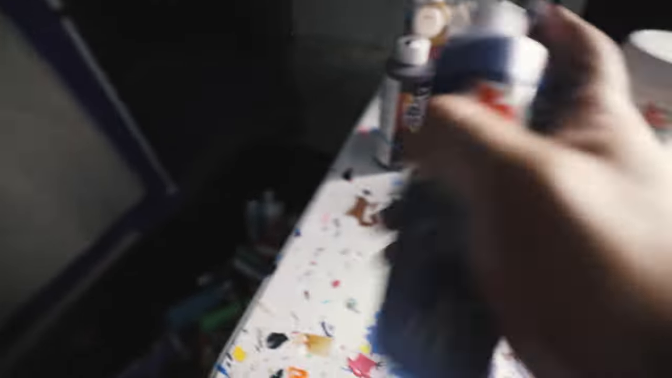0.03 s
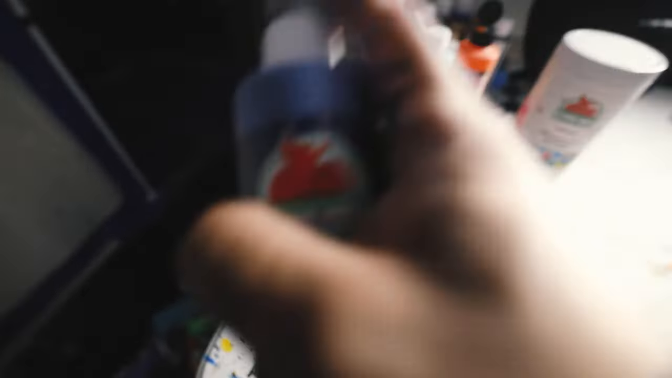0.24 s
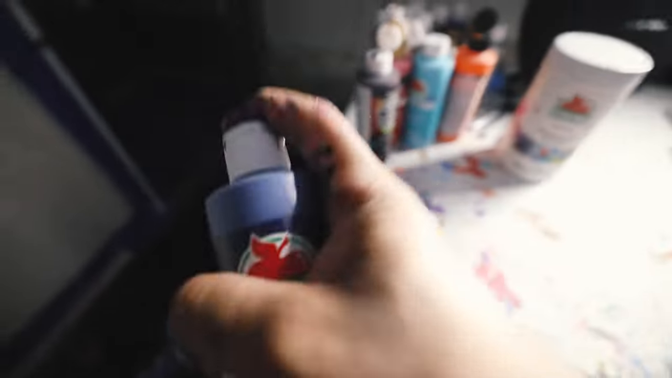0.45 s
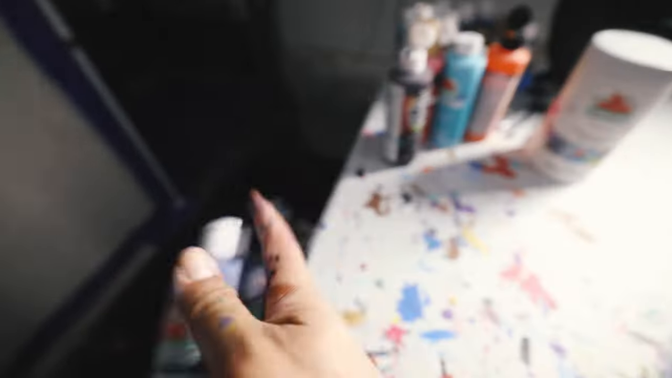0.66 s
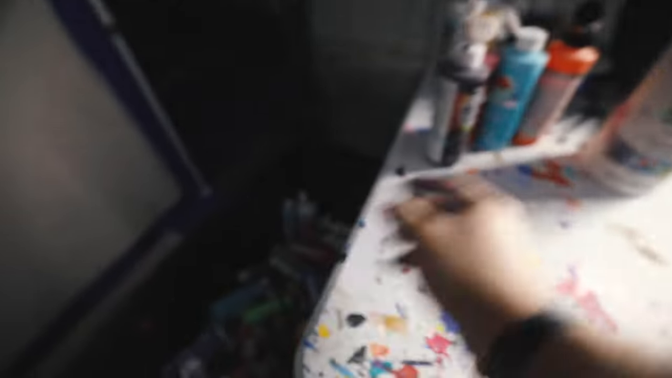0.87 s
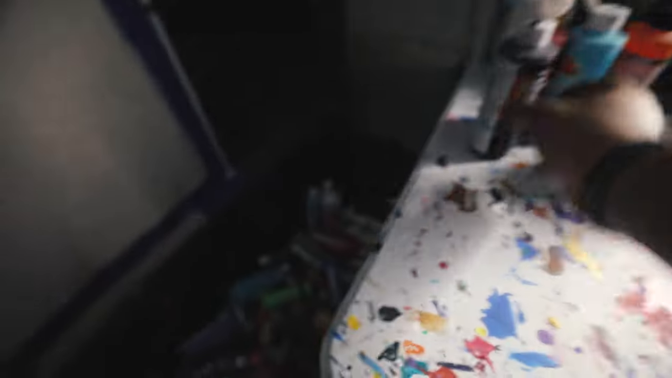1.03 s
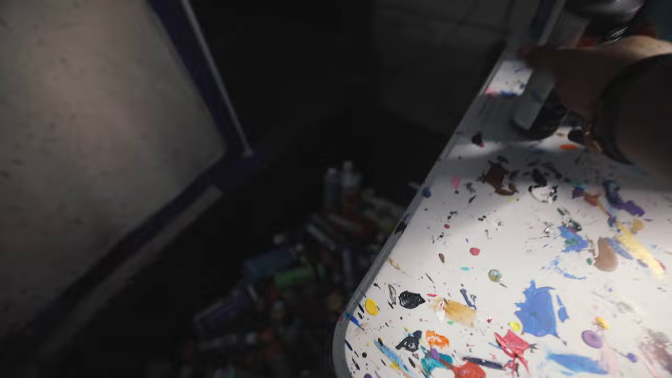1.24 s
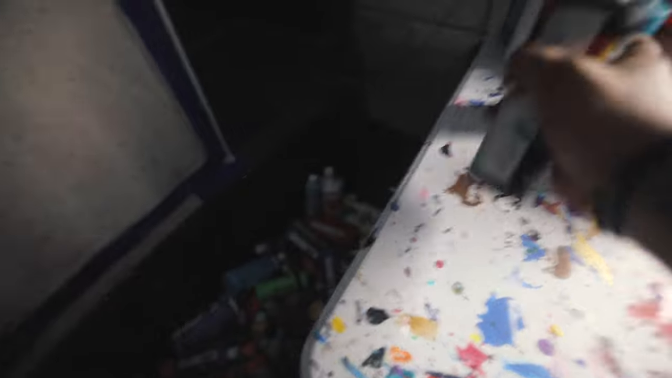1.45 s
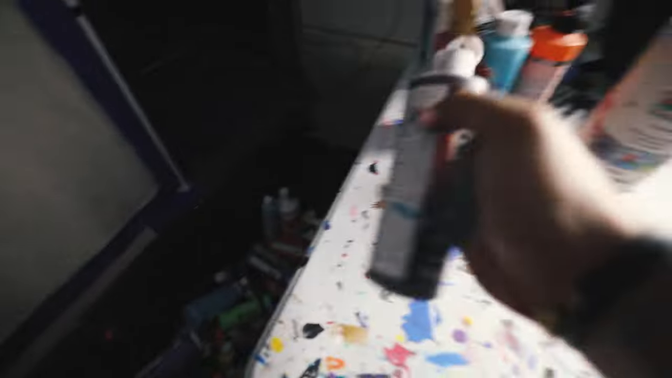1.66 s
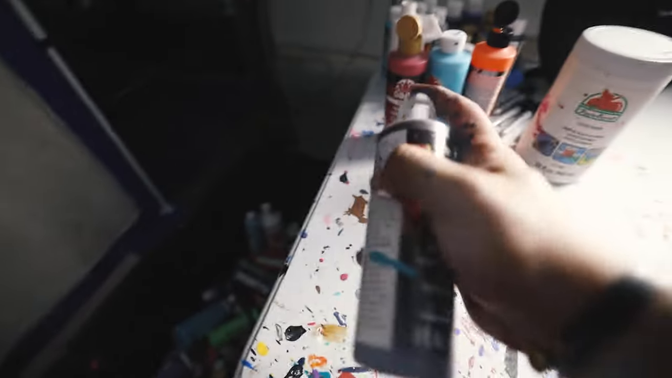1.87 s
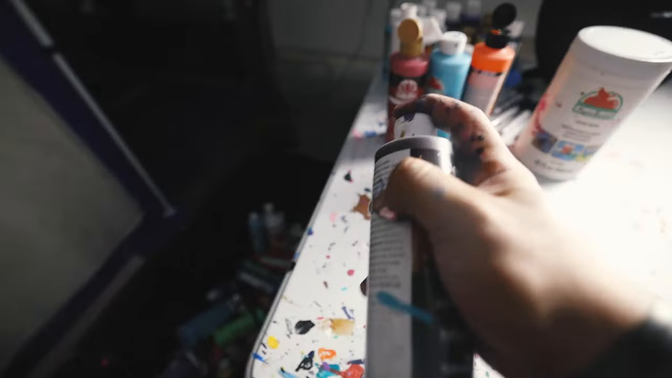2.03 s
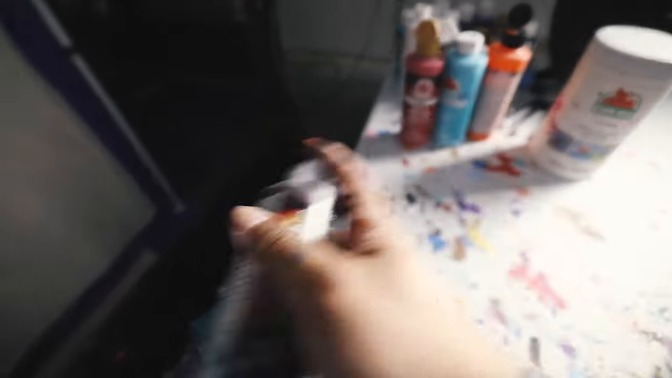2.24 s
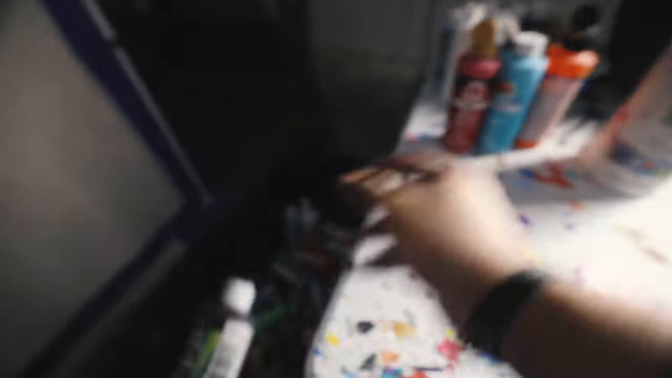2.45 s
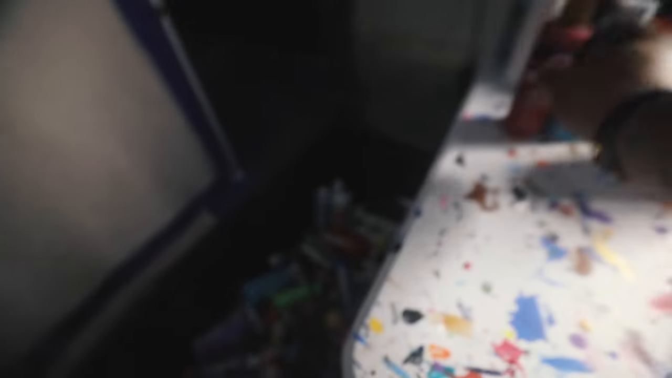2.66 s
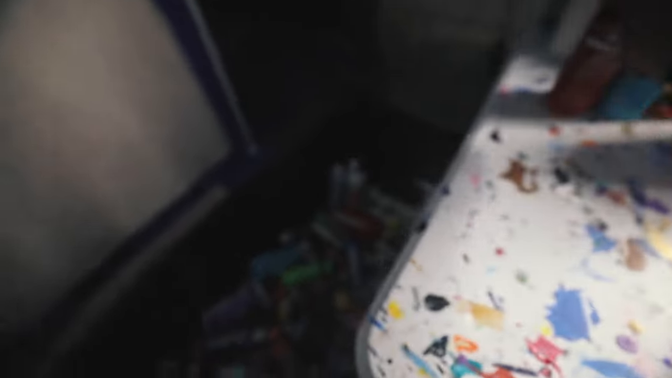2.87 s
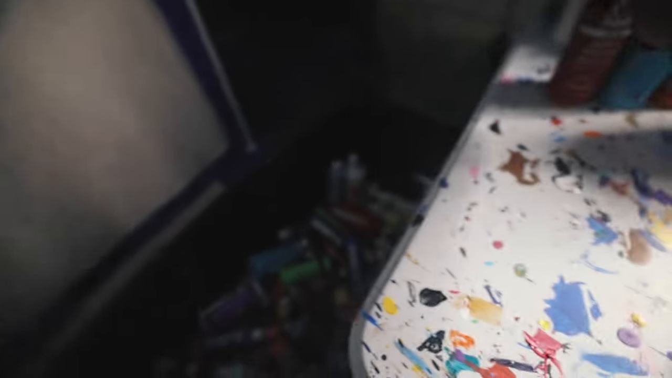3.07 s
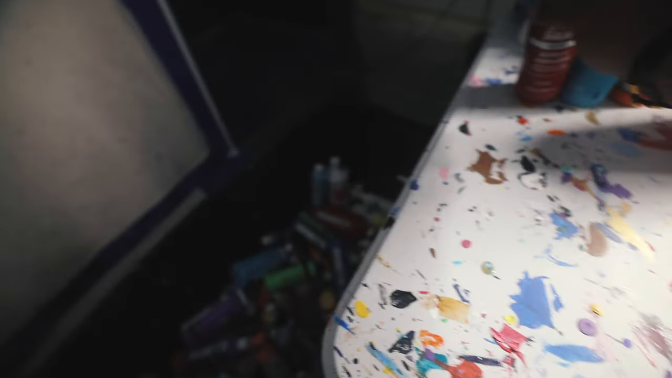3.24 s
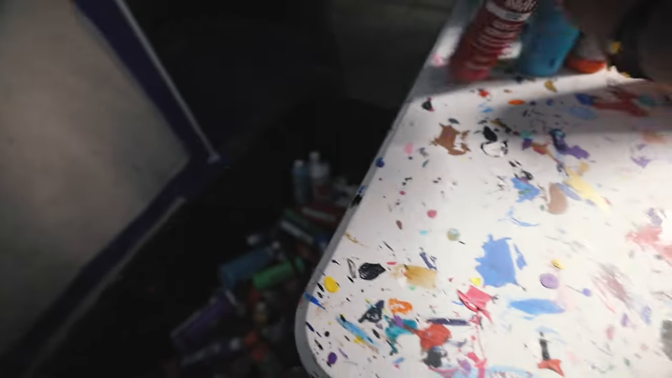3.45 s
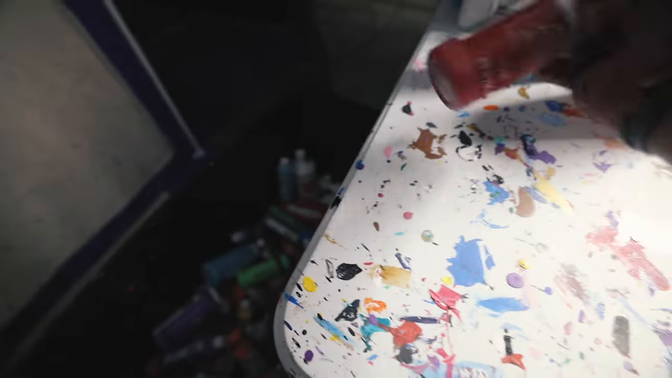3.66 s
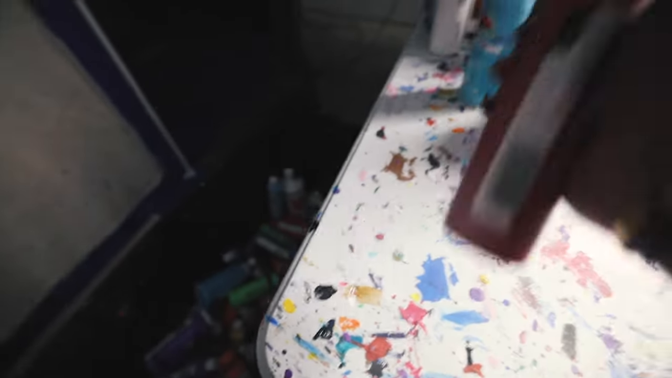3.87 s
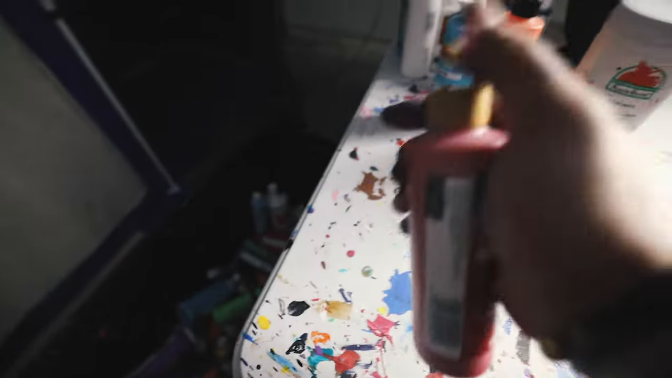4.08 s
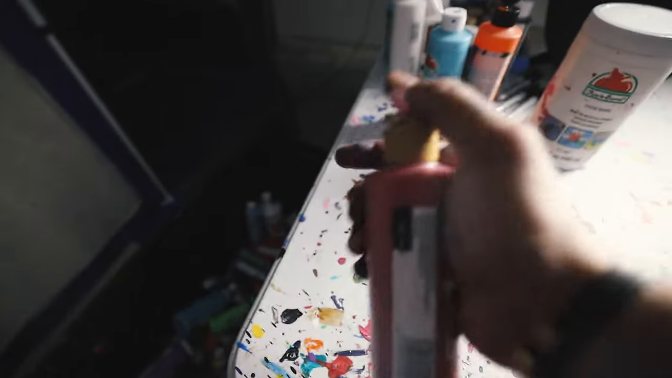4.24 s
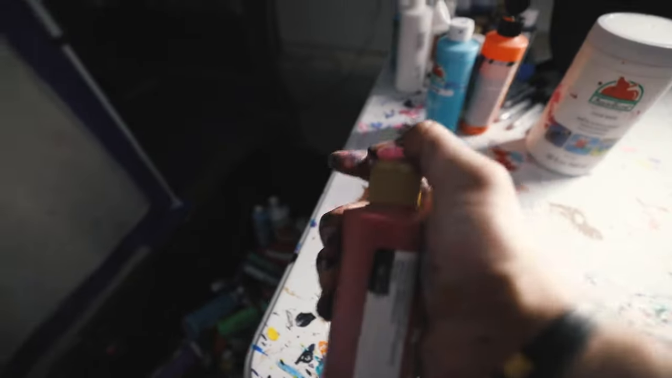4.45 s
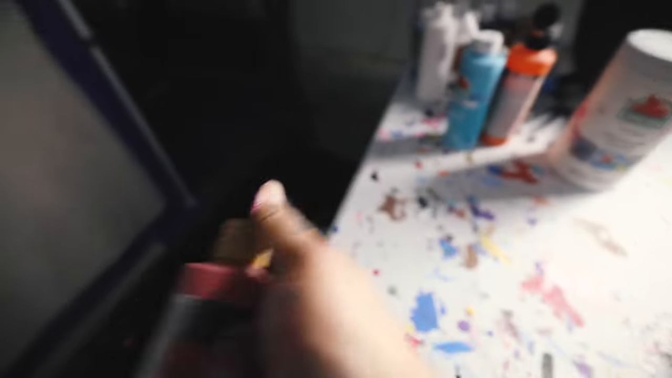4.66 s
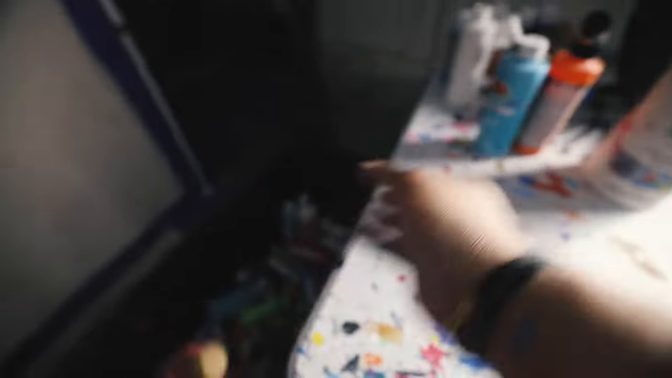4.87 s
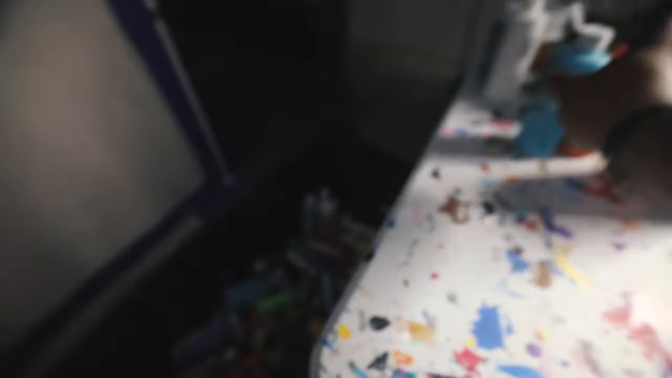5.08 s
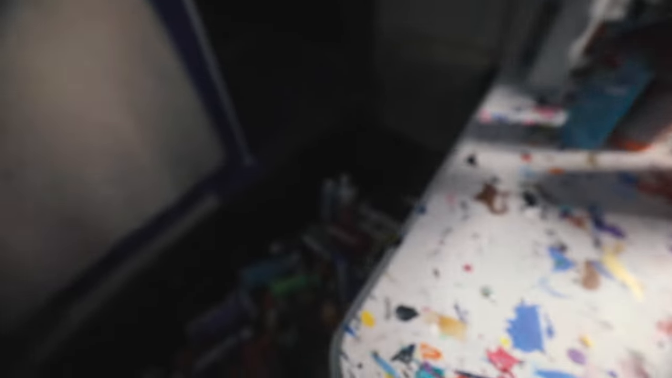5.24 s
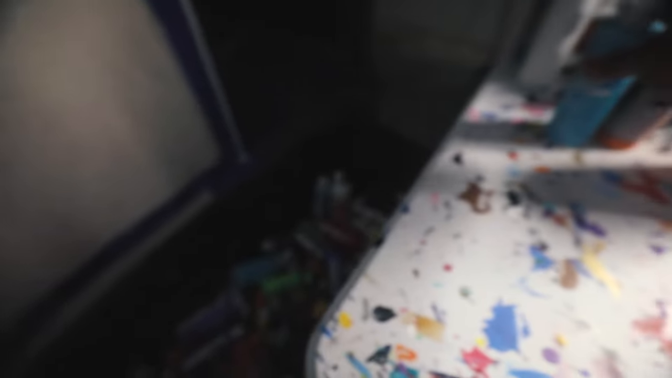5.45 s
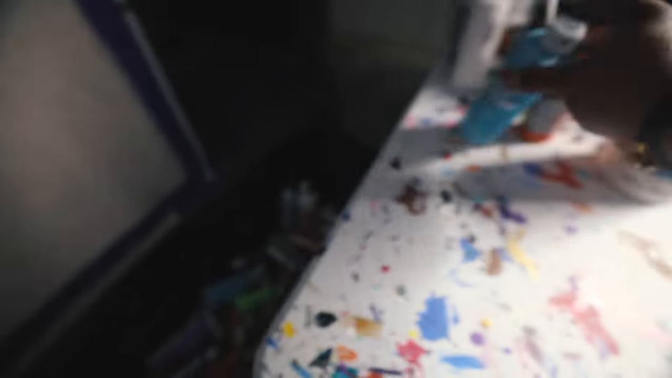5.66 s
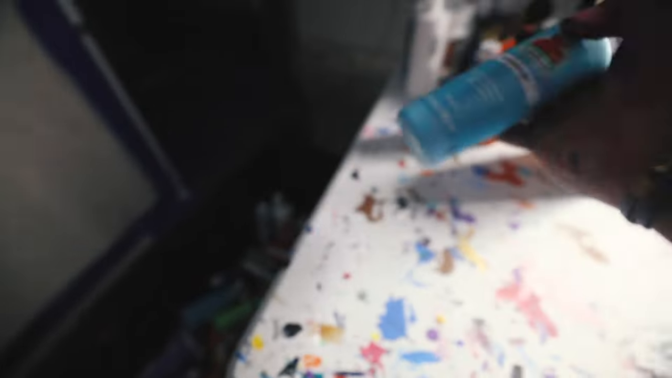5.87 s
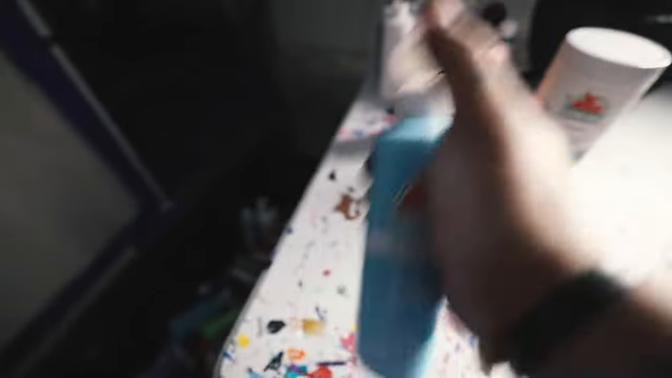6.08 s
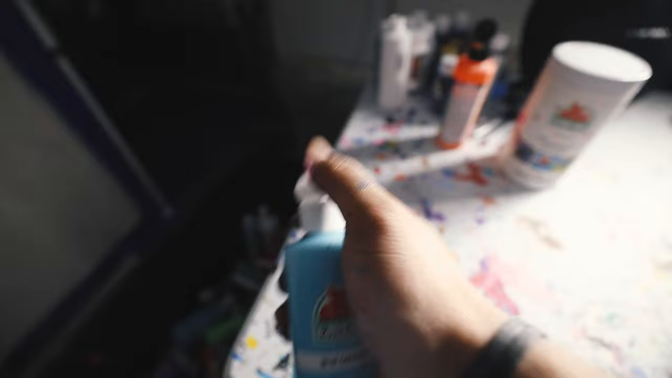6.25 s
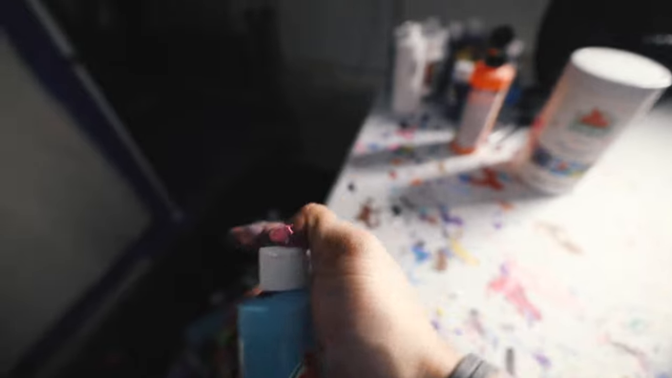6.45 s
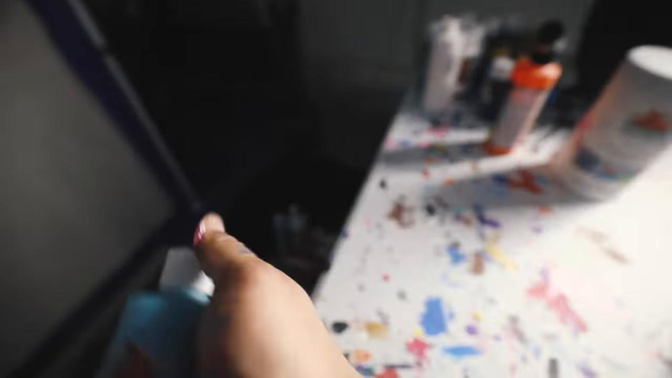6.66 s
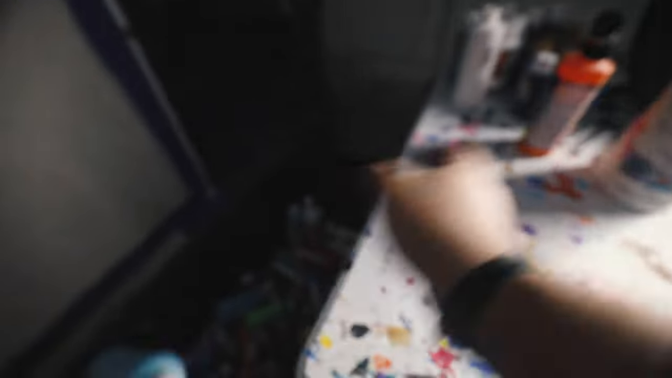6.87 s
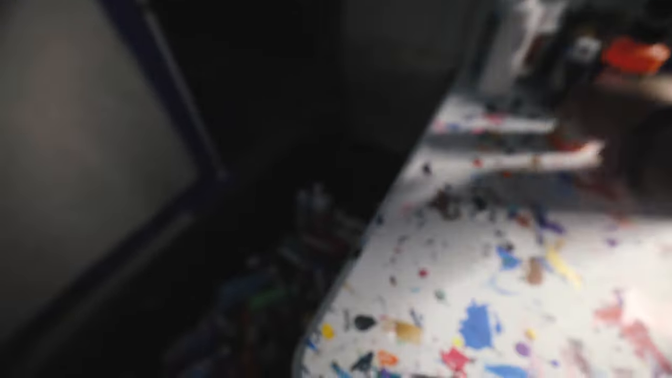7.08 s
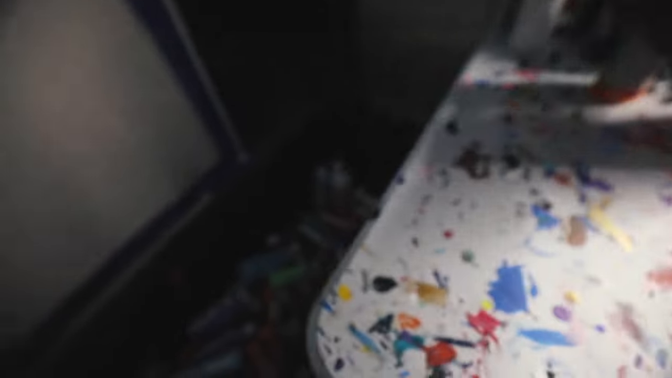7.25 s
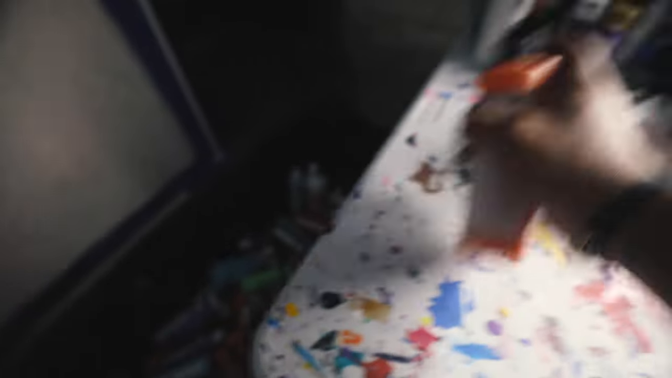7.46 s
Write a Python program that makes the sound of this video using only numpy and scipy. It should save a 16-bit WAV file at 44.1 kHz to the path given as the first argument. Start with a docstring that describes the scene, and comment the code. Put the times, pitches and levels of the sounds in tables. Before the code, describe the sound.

Sharp cap clicks and clattering plastic-on-table knocks alternate at irregular intervals, with faint finger rubs and nail ticks in a quiet, humming small room.

```python
"""Plastic paint bottles are picked from a crowded folding table in a small studio, over low ventilation hum.
Fan tones and shaped noise run throughout. First come light knocks and finger rubs (grainy skin noise), with nail
ticks (decaying resonant noise) among them; then a flip cap snaps close by (a crack coloured by lid and rim).
Harder knocks follow, each a noisy clack with ringing bottle-wall modes and a swelling boom of tabletop modes.
Snaps and bursts of knocks then alternate to the end, with small grip shifts, taps and slides around them."""
import sys
import numpy as np
from scipy import signal
from scipy.fft import rfft, irfft, next_fast_len
from scipy.io import wavfile
from scipy.ndimage import uniform_filter1d, minimum_filter1d, map_coordinates

SR = 44100
rng = np.random.default_rng(int(sys.argv[2]) if len(sys.argv) > 2 else 0)


def master_out(mix):
    """Clip the mix to full scale and print it as 16-bit PCM to the path in sys.argv[1]."""
    frames = np.transpose(np.atleast_2d(mix))
    ceiling = np.clip(frames, -1, 1)
    pcm = np.round(ceiling * 32767).astype(np.int16)
    wavfile.write(sys.argv[1], SR, pcm)


N = 331191
T = np.arange(int(SR * .6)) / SR  # time axis of one short sound, s

# Modes of the hollow tabletop. Each row: nominal frequency in Hz, relative level in dB, t60 in seconds.
TABLE_MODES = [(94, -32, 0.18), (108.8, -3, 0.3), (118, 2, 0.17), (138.5, -26.5, 0.95), (159.4, 5, 0.16),
               (177.9, -3, 0.34), (207.6, -5, 0.25), (231.5, -7, 0.32), (270.6, -8.5, 0.17),
               (309.3, -10.5, 0.25), (361.4, -20, 0.26), (401, -14.5, 0.22)]
# Noise spectrum of skin and nails on plastic. Each row: frequency in Hz, relative level in dB.
SKIN_SPECTRUM = [(300, -8), (1000, 10), (2200, 9.5), (5000, 6.5), (8000, -1), (12000, -0.5), (16000, -23)]


def knocks():
    """Impact and rebound: each blow is followed by a softer, duller one as the bottle rocks onto its other edge."""
    # Bottles knocking on the table. Each row: start in seconds, relative clack level in dB,
    # relative table boom level in dB, brightness in dB per octave, tabletop frequency the spot favours in Hz.
    blows = [(0.0, -41.5, -25.5, 0, 175), (0.15, -38.5, -32.5, -0.5, 270),
             (0.8369, -28.5, -33.5, -3.5, 169), (0.9126, -28.5, -31.5, -0.5, 168),
             (1.1036, -17, -19.5, 2, 128), (1.1208, -13.5, -10, 1, 119), (1.2697, -33, -40, -5, 160),
             (1.3472, -28.5, -16.5, 1.5, 178), (1.3696, -25, -32, -1, 174), (1.395, -26.5, -23, -1.5, 185),
             (1.4394, -29, -24, -0.5, 187), (1.53, -46, -30, 0, 127), (2.7676, -16, -14.5, 2.5, 130),
             (2.7844, -9, -19.5, 1, 130), (2.8173, -19, -13, 1.5, 128), (2.898, -31, -40, -3.5, 165),
             (2.9495, -36, -23, -0.5, 192), (3.0113, -28.5, -25, 1, 192), (3.1378, -34.5, -32.5, 0, 144),
             (3.5624, -35.5, -30.5, 2, 236), (5.1605, -8.5, -29, 1.5, 370), (5.1642, -9, -11.5, -5.5, 370),
             (5.2108, -17, -21.5, 2.5, 108), (5.2454, -22.5, -19.5, -0.5, 337),
             (5.733, -42.5, -38, 4.5, 162), (7.1574, -8.5, -5, 1, 151), (7.1959, -11, -10.5, -2, 162),
             (7.2428, -20.5, -15.5, 0, 153), (7.2989, -22, -30.5, 2, 162), (7.415, -32, -37, 3.5, 160)]
    rebound_s, rebound_db, rebound_boom_db = 0.024, -11, -6  # delay; clack and boom against the first blow
    rebound_tilt = -4.4  # change of brightness, dB per octave
    swell_s = 0.012  # the tabletop takes a few cycles to get going

    out = np.zeros(N)
    swell = 1 - np.exp(-(T / swell_s) ** 2)
    modes = np.array([ring([mode], scatter_db=.5, detune=0.00092) for mode in TABLE_MODES])
    swelling_modes = modes * swell
    for s, db, boom_db, bright, spot_hz in blows:
        first = knock(db, boom_db, bright, spot_hz, swelling_modes)
        add(out, s, first)
        second = knock(db + rebound_db, boom_db + rebound_boom_db, bright + rebound_tilt,
                       spot_hz, swelling_modes)
        add(out, s + rebound_s, second)
    return out


def knock(db, boom_db, bright, spot_hz, swelling_modes):
    """Modal excitation: a chattering contact force drives the shell, while bottle and tabletop modes ring."""
    # Clack spectrum. Each row: frequency in Hz, relative level in dB.
    clack_spectrum = [(45, -9), (150, 0), (370, 5.5), (490, -11.5), (750, 1.5), (1200, 2), (2200, -0.5),
                      (3000, -3), (5000, -8), (6500, -13), (8500, -19.5), (11000, -21.5), (15500, -35.5)]
    # Bottle-wall modes. Each row: nominal frequency in Hz, relative level in dB, t60 in seconds.
    wall_modes = [(773, -10.5, 0.11), (985, -4.5, 0.069), (1192, 6.5, 0.052), (1447, -3.5, 0.057),
                  (1627, -6, 0.14), (1860, -8, 0.039), (2117, 5, 0.014), (2570, -6, 0.018),
                  (3460, 2, 0.023)]
    chatter_t60_s, chatter_db_per_doubling = 0.022, 26  # rattle at db = 0; gentler knocks scuff for longer
    wall_db, wall_per_tilt = -13.5, -0.89  # against db; a dull, flat landing rings more (dB per dB/octave)

    def shell_level(hz):
        return along(clack_spectrum, hz) + bright * np.log2(np.maximum(hz, 500) / 2000)

    shell = amp(db + 2.0) * pulse(shell_level)
    chatter_t60 = chatter_t60_s * 2 ** (-db / chatter_db_per_doubling)
    settling = fade(chatter_t60) + amp(-23.0) * fade(0.14)
    # the rim rattles as it settles
    chatter = settling * rng.standard_normal(len(T)) * amp(5.1 * wobble(475, len(T)))
    force = chatter * np.linalg.norm(settling) / np.linalg.norm(chatter)
    force[0] += 2.5  # the first contact
    clack = signal.fftconvolve(force, shell)[:len(T)]

    wall_gain = amp(db + wall_db + wall_per_tilt * bright)
    walls = wall_gain * ring(wall_modes, scatter_db=0.0, detune=0.024) * (1 - fade(0.004))

    mode_hz = np.transpose(TABLE_MODES)[0]
    favour = amp(6.0 * bump(mode_hz, spot_hz, octaves=0.36))
    boom = amp(boom_db - 0.5) * unit(favour) @ swelling_modes

    contact = np.pad(shell, (0, len(T) - len(shell)))
    radiated = amp(-10) * boom + amp(-5.5) * walls + amp(15.5) * contact
    return clack + walls + boom + room(radiated, early=0.76)


def snaps():
    """Sudden release of strain: the cap's lip jumps its catch, a dry crack that rings lid and rim briefly."""
    # Flip caps catching and snapping. Each row: start in seconds, relative level in dB, lid resonance in Hz,
    # lid boost in dB, rim resonance in Hz, rim boost in dB, treble slope in dB per octave.
    catches = [(0.4234, -4.5, 2070, 16, 6600, 10.5, -2.5), (0.4821, -5, 2100, 7, 3800, 9.5, -4),
               (2.0807, -5, 970, 8, 2080, 10.5, -9), (2.1249, 5.5, 2580, 12.5, 4600, 9.5, 1),
               (4.4503, -18, 1130, 5.5, 2400, 1, -10), (4.482, 1.5, 2300, 10.5, 4740, 9.5, 2.5),
               (6.502, -22, 1410, 13, 2120, 8, -11), (6.506, -12.5, 1360, 15, 2180, 12, -5),
               (6.513, -10, 2800, 14, 4770, 2, 3), (6.5153, -5.5, 1840, 13.5, 6180, 10, 2.5)]
    # Crack spectrum. Each row: frequency in Hz, relative level in dB.
    crack_spectrum = [(100, -19), (330, 6.5), (550, -7.5), (1100, 4.5), (2400, 3), (3100, 1.5), (5500, 0),
                      (7500, -6.5), (9500, -6), (11500, -4.5), (16000, -24)]
    room_db = -16  # the room's answer against the crack

    out = np.zeros(N)
    for s, db, lid_hz, lid_db, rim_hz, rim_db, treble in catches:
        def crack(hz):
            return along(crack_spectrum, hz) + treble * np.log2(np.maximum(hz, 2500) / 2500)

        def lid(hz):
            return lid_db * bump(hz, lid_hz, octaves=0.51)

        def rim(hz):
            return rim_db * bump(hz, rim_hz, octaves=0.16)

        def dull(hz):
            return -3 * np.log2(np.maximum(hz, 5000) / 5000)

        # the lip scrapes over the catch
        force = 0.067 * rng.standard_normal(len(T)) * np.exp(-(T / 0.0027) ** 4)
        force[0] += .66  # and lets go
        direct_pulse = pulse(lambda hz: crack(hz) + lid(hz) + rim(hz))
        near = signal.fftconvolve(force, direct_pulse)[:len(T)]
        # averaged over directions, the colour is milder
        around = pulse(lambda hz: crack(hz) + 0.7 * lid(hz) + rim(hz) + dull(hz))
        add(out, s, amp(db + 15.0) * (near + amp(room_db) * room(around, early=0.52)))
    return out


def fingers():
    """Friction and light impact: taps and slides, with small random shifts of the grip between them."""
    # Fingernails tapping a bottle. Each row: start in seconds, relative level in dB, pitch in Hz.
    taps = [(0.4514, -22, 1980), (0.5287, -39, 2020), (0.685, -29.5, 2030), (1.834, -30.5, 1850),
            (2.0428, -30.5, 2230), (2.0721, -29, 2260), (2.32, -27, 2200), (3.276, -31, 4140),
            (3.4017, -30.5, 1700), (3.9848, -25, 1980), (4.3058, -36.5, 2400), (5.6527, -27.5, 2170),
            (6.419, -27.5, 1630), (6.767, -29.5, 3390), (6.8063, -25, 3420)]
    # A bottle sliding through the fingers. Each row: start in seconds, length in seconds,
    # relative level in dB, squeak in Hz.
    slides = [(0.039, 0.12, -47.5, 2100), (0.103, 0.098, -46.5, 4420), (0.279, 0.04, -43.5, 2180),
              (0.351, 0.079, -47, 2000), (0.688, 0.065, -43.5, 3040), (0.783, 0.19, -51, 3720),
              (1.506, 0.16, -47.5, 3430), (1.668, 0.097, -51.5, 5400), (3.281, 0.018, -41.5, 5170),
              (3.847, 0.17, -54, 5160), (6.118, 0.03, -46.5, 6060)]
    # The grip shifts while a bottle is held. Each row: start in seconds, end in seconds,
    # mean relative level of its small rubs in dB, squeak in Hz.
    holds = [(1.77, 1.93, -52, 2560), (2.325, 2.39, -52.5, 2200), (3.435, 3.62, -57, 1960),
             (4.062, 4.18, -59.5, 3200), (4.709, 4.87, -54, 3320), (5.517, 5.76, -55.5, 3240),
             (5.912, 6.07, -52.5, 5900), (6.726, 6.85, -54.5, 3400)]
    shifts_per_s, shift_s = 12, 0.065  # mean rate and length of the small rubs
    shift_tick_db = 14  # mean level setting of the tick that starts each, against the hold's level

    out = np.zeros(N)
    for s, db, pitch_hz in taps:
        add(out, s, amp(db) * tick(pitch_hz))
    for s, length, db, squeak_hz in slides:
        add(out, s, amp(db) * rub(length, squeak_hz))
    for start, end, db, squeak_hz in holds:
        for s in np.arange(start, end, 1 / shifts_per_s):
            late, rub_db, tick_db = rng.normal(size=3) * [0.01, 1.5, 3]
            small_rub = amp(db + rub_db) * rub(shift_s, squeak_hz)
            small_tick = amp(db + shift_tick_db + tick_db) * tick(squeak_hz)
            add(out, s + late, small_rub + small_tick)
    reflected = signal.fftconvolve(out, room([1], early=0.69))[:N]
    return out + amp(-9) * reflected


def tick(pitch_hz):
    """Damped resonance: a fingernail meets the plastic, giving quickly fading noise around one pitch."""
    def level(hz):
        return along(SKIN_SPECTRUM, hz) + 12 * bump(hz, pitch_hz, octaves=0.13)

    return amp(-5) * fade(0.015) * noise(level, len(T))


def rub(length, squeak_hz):
    """Stick-slip friction: a stroke of skin on plastic is noise with a grainy, irregular envelope."""
    def level(hz):
        return along(SKIN_SPECTRUM, hz) + 6.8 * bump(hz, squeak_hz, octaves=0.16)

    stroke = np.sqrt(np.abs(np.sin(np.pi * np.minimum(T / length, 1))))
    grip = unit(amp(3.4 * wobble(51.0, len(T)) + 1.7 * wobble(501, len(T))))  # skin sticks and slips
    return stroke * grip * noise(level, len(T))


def ventilation():
    """Broadband flow noise and tonal fan noise: steady air with a low rumble and a few wavering tones."""
    # Air noise spectrum. Each row: frequency in Hz, relative level in dB.
    air_spectrum = [(18, -89), (30, -45.5), (124, -1.5), (210, -13.5), (303, -16), (336, -20), (449, -23),
                    (540, -28), (584, -28.5), (913, -19.5), (1350, -25), (1810, -30), (2010, -28),
                    (2750, -32.5), (16000, -55)]
    # Fan tones. Each row: mean frequency in Hz, mean level in dB.
    fan_tones = [(120, -51), (596, -65), (932, -62), (1320, -68)]

    def air_level(hz):
        peak = 3 * bump(hz, 730, octaves=0.014)
        dip = 4 * bump(hz, 504, octaves=0.071)
        return along(air_spectrum, hz) + peak - dip

    out = amp(-46) * noise(air_level, N)
    t = np.arange(N) / SR
    for hz, db in fan_tones:
        level = amp(db + 1.8 * wobble(9.7, N))
        out += level * np.sin(2 * np.pi * hz * t + 1.16 * wobble(13, N))
    return out


def room(x, early, early_t60=0.06):
    """Reverberation: dense echoes from nearby things, then a tail whose decay depends on frequency."""
    # Decay of the room. Each row: frequency in Hz, t60 in seconds.
    decay = [(100, 1), (300, 0.65), (1000, 0.45), (4500, 0.48), (9000, 0.35), (15000, 0.35)]
    hz, t, z = signal.stft(rng.standard_normal(len(T)), SR, nperseg=256)
    faded = z * fade(along(decay, hz)[:, None], t)
    tail = signal.istft(faded, SR, nperseg=256)[1][:len(T)]
    tail = tail * (1 + early * fade(early_t60)) * (1 - fade(0.0033))
    return signal.fftconvolve(x, tail / np.linalg.norm(tail))[:len(T)]


def ring(modes, scatter_db, detune):
    """Modal superposition: damped modes struck together, their strength and pitch slightly uncertain."""
    total = 0
    for hz, db, t60 in modes:
        strength = amp(db + scatter_db * rng.normal())
        pitch = hz * (1 + detune * rng.normal())
        total = total + strength * fade(t60) * np.sin(2 * np.pi * pitch * T)
    return total


def pulse(level_db, size=2048):
    """Minimum phase: folding the cepstrum gives the most compact causal pulse of a spectrum, at energy 1."""
    cepstrum = irfft(np.log(amp(level_db(np.fft.rfftfreq(size, 1 / SR)))))
    h = irfft(np.exp(rfft(2 * cepstrum[:size // 2], size)))
    return h / np.linalg.norm(h)


def noise(level_db, size):
    """Spectral shaping: random noise of rms 1 whose level in dB is a function of frequency."""
    return unit(filtered(rng.standard_normal(size), lambda hz: amp(level_db(hz))))


def filtered(x, response):
    """Linear filtering: the spectrum of x times a response of frequency."""
    m = next_fast_len(len(x) + 8192)
    return irfft(rfft(x, m) * response(np.fft.rfftfreq(m, 1 / SR)), m)[:len(x)]


def wobble(rate, size):
    """Random modulation: a smooth curve through random knots, rate knots a second."""
    knots = rng.standard_normal(int(size * rate / SR) + 4)
    return map_coordinates(knots, [np.arange(size) * rate / SR])


def fade(t60, t=T):
    """Exponential decay, 60 dB down after t60 seconds."""
    return amp(-60 * t / t60)


def bump(hz, centre, octaves):
    """Resonance shape: a bell on the log-frequency axis."""
    return np.exp(-(np.log2((hz + 1) / centre) / octaves) ** 2)


def along(points, hz):
    """Logarithmic frequency scale: (Hz, value) points interpolated on a log axis."""
    f, v = np.transpose(points)
    return np.interp(np.log(hz + 1), np.log(f), v)


def amp(db):
    """Decibel scale: level to amplitude gain."""
    return 10 ** (np.asarray(db) / 20)


def unit(x):
    """Root mean square normalisation: scale to rms 1."""
    return x / np.sqrt(np.mean(x ** 2) + 1e-20)


def add(track, s, sound):
    """Superposition: mix a sound into the track at time s in seconds."""
    start = max(round(s * SR), 0)
    track[start:start + len(sound)] += sound[:N - start]


def scene():
    """Superposition of all sources at one microphone."""
    return (knocks() + snaps() + fingers() + ventilation())[None]


def limited(x, ceiling, release_s):
    """Peak limiting: peaks pull the gain down at once, and it then creeps back."""
    over = np.log(np.maximum(np.abs(x) / ceiling, 1))
    recovery = np.arange(N) / SR / release_s
    held = np.maximum.accumulate(over * np.exp(recovery)) * np.exp(-recovery)
    return x * uniform_filter1d(minimum_filter1d(np.exp(-held), size=41), size=41)


def record(dry):
    """Band limiting and saturation: the microphone sheds deep bass, limits and rounds peaks, and cuts the top."""
    top_hz = 16300  # centre of a 700 Hz wide slope
    x = signal.sosfilt(signal.butter(4, 64, 'high', fs=SR, output='sos'), dry[0])
    x = limited(x, ceiling=1.4, release_s=0.12)
    x = x / (1 + np.abs(x / .95) ** 6) ** (1 / 6)  # rounds off the highest peaks
    return filtered(x, lambda hz: np.clip((top_hz - hz) / 700 + .5, 0, 1))[None]


dry = scene()
out = record(dry)
master_out(out)
```